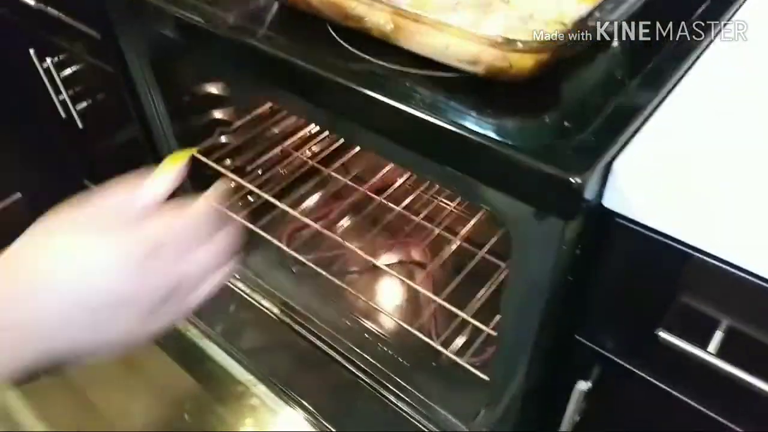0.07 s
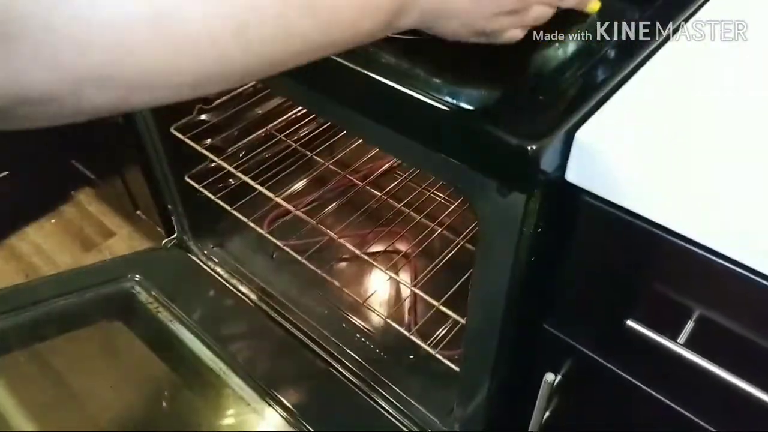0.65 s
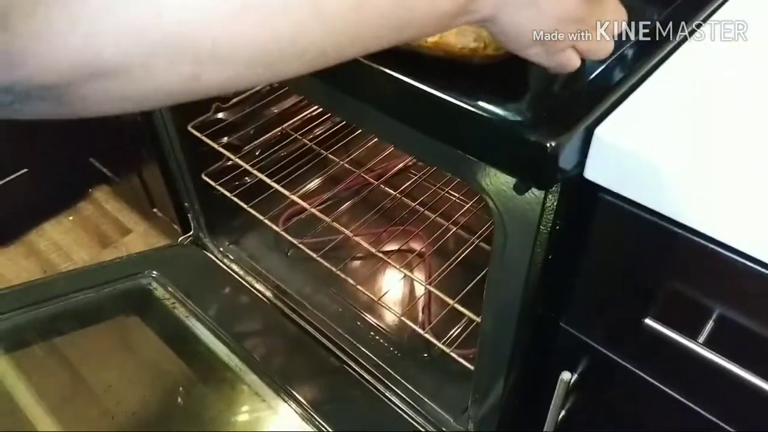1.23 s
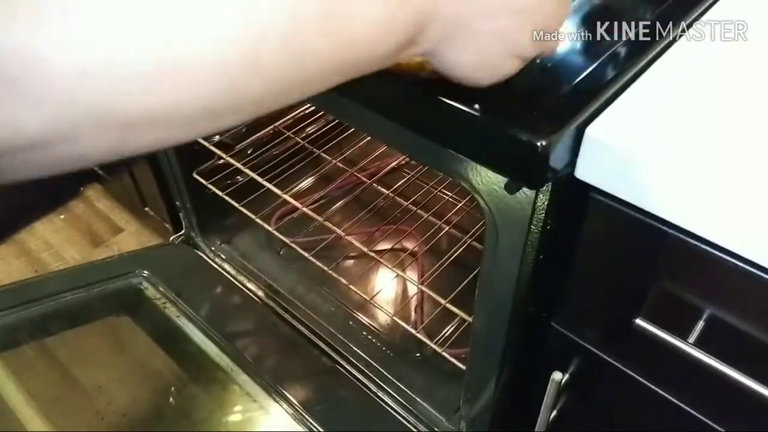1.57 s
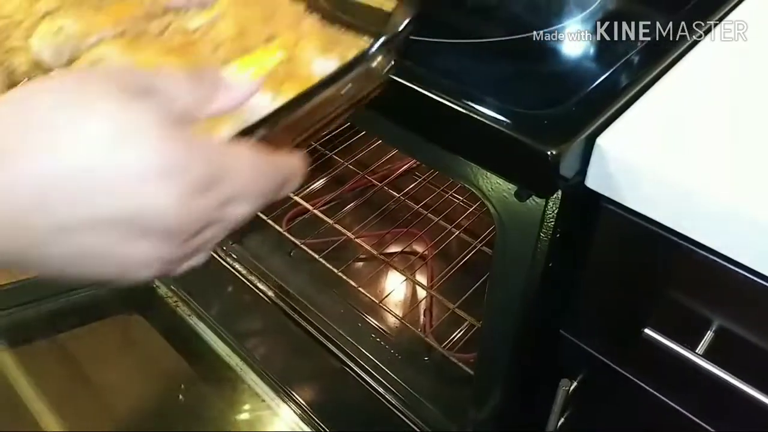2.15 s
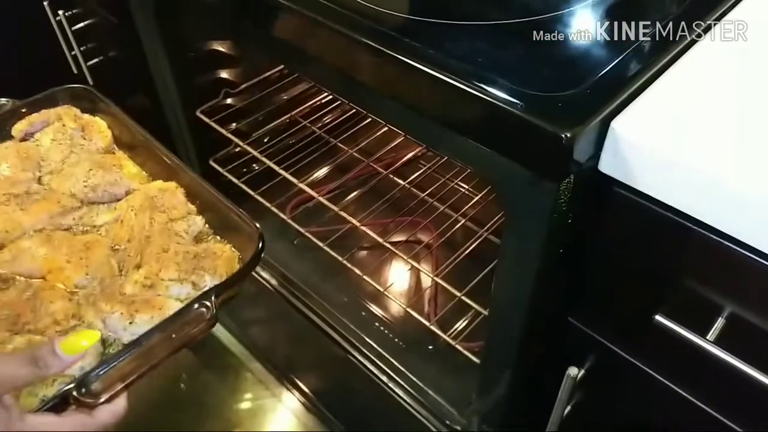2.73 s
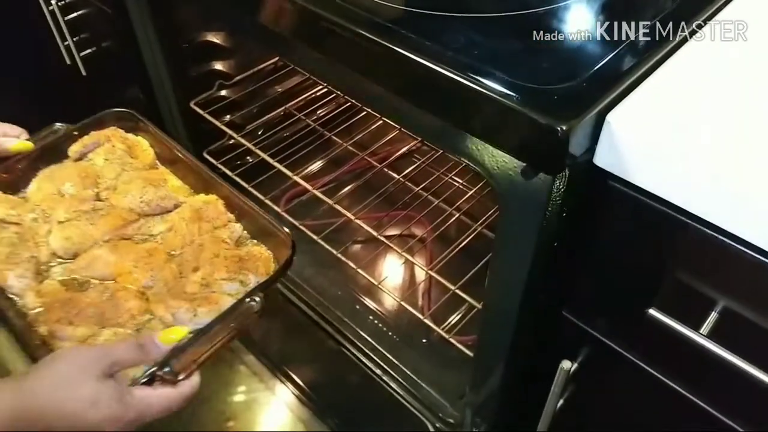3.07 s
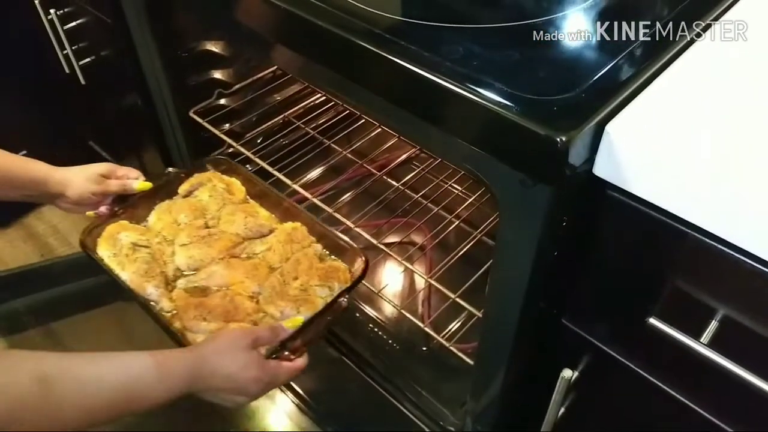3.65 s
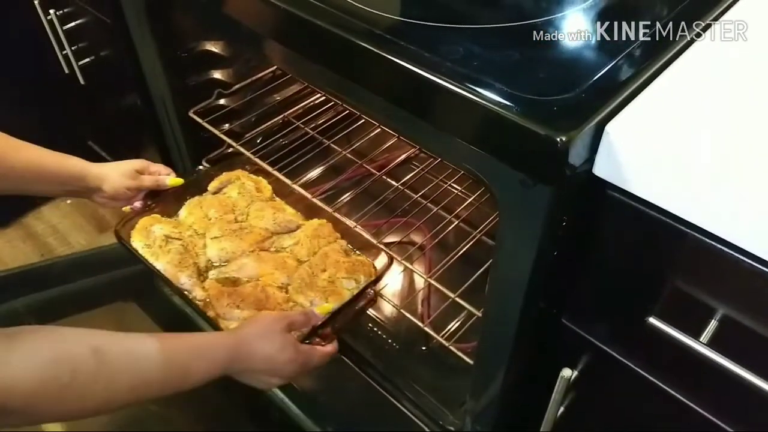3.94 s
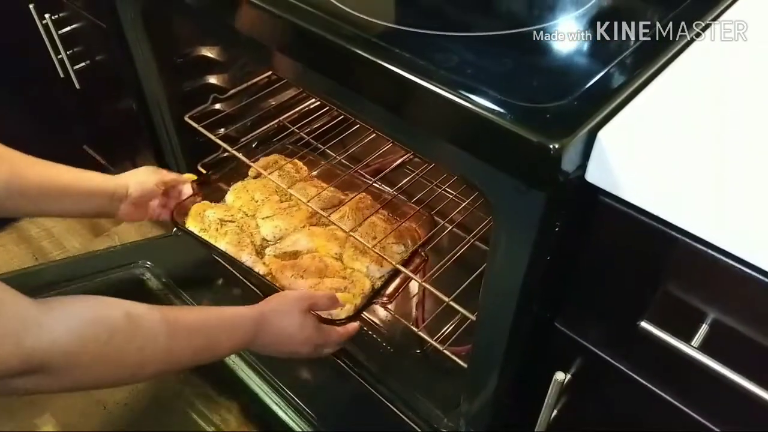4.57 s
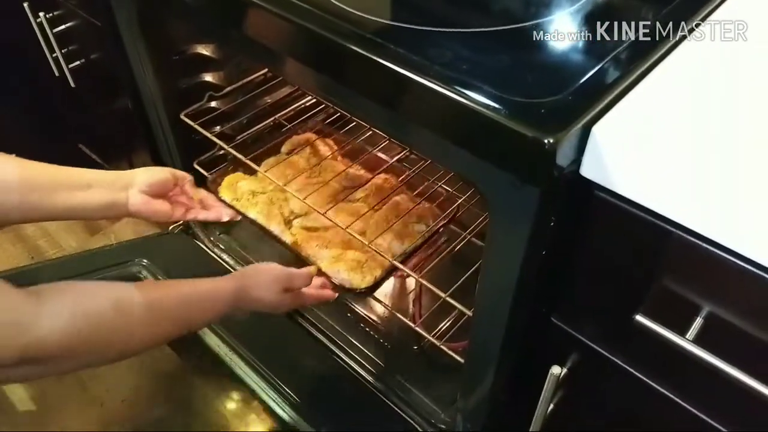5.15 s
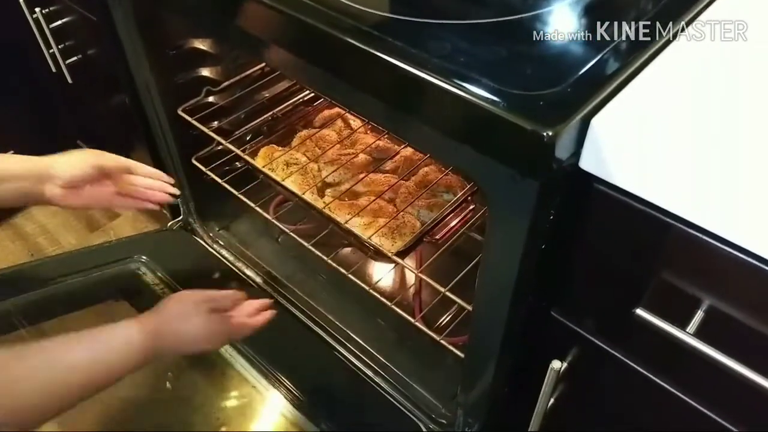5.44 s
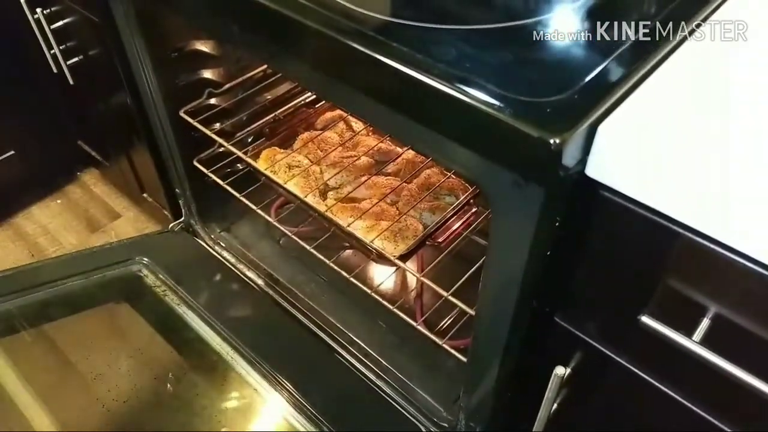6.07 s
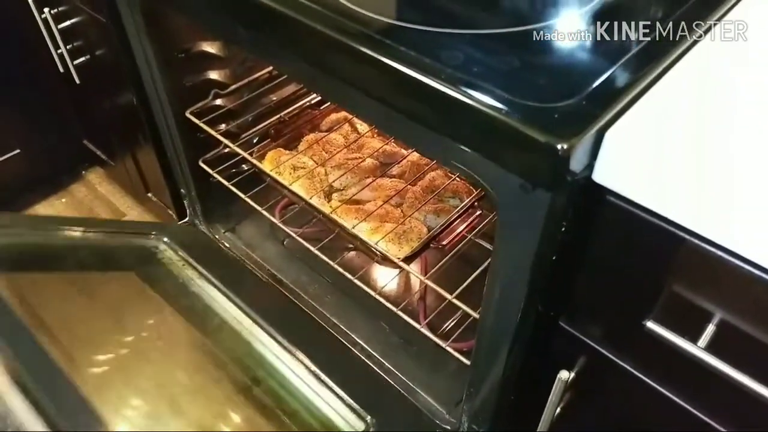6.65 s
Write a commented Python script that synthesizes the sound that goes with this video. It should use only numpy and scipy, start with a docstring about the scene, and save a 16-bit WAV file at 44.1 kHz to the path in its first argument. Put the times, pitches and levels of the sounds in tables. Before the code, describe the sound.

Glass clacks and drags on a stove, then rattles and scrapes over a ringing metal oven rack in a small kitchen.

```python
"""Glass baking dish into the oven.

A full glass dish is knocked and dragged on a glass stove top, thumping the steel panel beneath.
It is lifted, clanks onto a wire rack and judders in, sticking and slipping, while the rack and the
steel oven box ring. Then the door bobs, clunks on its hinge and starts to swing up.
A small, hard kitchen answers the knocks and scrapes."""
import sys
import numpy as np
from scipy import signal
from scipy.fft import rfft, irfft, next_fast_len
from scipy.io import wavfile
from scipy.ndimage import uniform_filter1d, map_coordinates

SR = 44100
rng = np.random.default_rng(int(sys.argv[2]) if len(sys.argv) > 2 else 0)


def persist_wave(psi):
    """Save psi, clipped to +-1, as 16-bit WAV."""
    counts = np.round(np.clip(psi, -1, 1) * 32767).astype(np.int16)
    wavfile.write(sys.argv[1], SR, np.atleast_2d(counts).T)


N = 300313

# shoves of the dish over the wires: start_s, end_s, level_db
SHOVES = [(4.055, 4.7, -33), (4.635, 4.867, -20), (4.848, 5.381, -23), (5.234, 5.805, -31)]
# glass on the stove top: start_s, level_db, presence_db, treble_db, thump_vs_clack_db
STOVE_KNOCKS = [(0.012, -48.5, 9, 18.5, -14), (0.057, -37, -1.5, 6.5, -47), (0.831, -41, -10.5, -16, 6),
                (1.013, -23, 0, 2, 4.5), (1.022, -34.5, -1, -7, 3), (1.101, -34.5, -3.5, 3, 6),
                (1.165, -45.5, 4, 21, 8.5)]
# resonances of the rack's long bars: pitch_hz, level_db
BAR_MODES = [(237, -7.5), (258, -2.5), (275, -3), (333, -1), (361, -3), (452, -15.5)]
# resonances of the steel oven box: pitch_hz, level_db
BOX_MODES = [(95, -7.5), (116, -4.5), (140, -3.5), (172, -3.5), (189, -11)]
# spectrum of the low rumble of stove and room: frequency_hz, level_db
RUMBLE_COLOUR = [(13, -66), (22, -27.5), (42, -9), (66, -3), (133, -2), (193, -13), (243, -22),
                 (381, -28.5), (400, -31.5), (520, -53), (880, -120)]


def rack_judder():
    """The dish lands and jumps from wire to wire; between the jumps it chatters over them."""
    # jumps onto a wire: start_s, level_db, presence_db, treble_db
    clanks = [(4.061, -23, 3, -1), (4.168, -24.5, -3, -5.5), (4.319, -28, 0.5, -13), (4.442, -34, -9.5, -5),
              (4.617, -31.5, 1, 6), (4.632, -22.5, -2.5, -5.5), (4.759, -18, -2, -3.5),
              (4.863, -31, -11.5, 2.5), (4.887, -19, 0, -2.5), (4.978, -24.5, -10, 0),
              (5.051, -25.5, -4, -3), (5.295, -22, -0.5, -11.5), (5.466, -37, -1.5, 10.5),
              (5.641, -40, -0.5, 4.5)]
    # resonances of the loaded wires: pitch_hz, level_db
    wire_modes = [(909.8, -57.5), (1012, -45.5), (1561, -44), (1739, -43.5), (1906, -42), (2078, -46),
                  (2196, -45), (2320, -45.5), (2487, -52.5), (2519, -37.5)]
    # spectrum of glass striking the rack: frequency_hz, level_db
    rack_colour = [(240, -30.5), (400, -5), (488, -16), (535, -7), (705, -9.5), (886, -3.5), (1220, -7),
                   (1510, -4.5), (1630, -4.5), (2320, -2.5), (2590, -0.5), (3300, -8), (5230, -10),
                   (9790, -26), (15500, -32)]
    # spectrum of the squeaky grit of glass on wire: frequency_hz, level_db
    grit_colour = [(3000, -36.5), (6000, -3.5), (8000, -1.5), (11000, -15), (15500, -6.5)]
    out = np.zeros(N)
    wires = [(hz, db, .14) for hz, db in wire_modes]  # short decay: the heavy dish damps them
    for s, db, presence_db, treble_db in clanks:
        clank = contact(rack_colour, treble_db, presence_db, ripple_db=3, spacing_hz=70.04)
        clank += amp(-16.5) * ring(wires)
        add(out, s, db, kitchen(clank, early_s=.0099, tail_db=2.5, direct=13))
        graze = kitchen(clank, early_s=.0028, tail_db=-18.5, direct=1)
        add(out, s - .004, db - 14, graze)  # the glass brushes the wire first
    force = push()
    body = contact(rack_colour, treble_db=-3.5) + amp(-16) * ring(wires, scatter_db=3)
    chatter = signal.fftconvolve(force * slips(per_s=120, spread_db=.5), body)[:N]
    grit = signal.fftconvolve(force * slips(per_s=90, spread_db=6.5), contact(grit_colour))[:N]
    return out + amp(-2.5) * kitchen(chatter + amp(-13.5) * grit, early_s=.012, tail_db=-3, direct=2.1)


def push():
    """Force on the dish as a gain per sample: every shove builds fast, eases off and stops."""
    return strokes(SHOVES, attack_s=.11, release_s=.27, ease_db_per_s=17.5)


def oven_body():
    """The judder shakes the steel box and the rack's long bars, which drone on."""
    box = resonate(slips(per_s=360, spread_db=-1), BOX_MODES, width_hz=24.8)
    box *= rings_on(push(), follow=.36, fall_db_per_s=110)
    bars = resonate(slips(per_s=340, spread_db=6.5), BAR_MODES, width_hz=10.8)
    bars *= rings_on(push(), follow=.59, fall_db_per_s=25)
    return amp(-35.5) * box + amp(-34) * bars


def free_wires():
    """Wires that the dish does not touch sing on faintly after each shove."""
    # resonances of the free wires: pitch_hz, level_db
    wire_modes = [(810, -3), (1090, -5.5), (1450, -0.5), (1750, -2.5), (2290, -1), (2680, -4), (3020, -7.5),
                  (4650, -13.5)]
    singing = resonate(slips(per_s=670, spread_db=2.5), wire_modes, width_hz=130)
    return amp(-34.5) * rings_on(push(), follow=.54, fall_db_per_s=43) * singing


def glass_chirps(count=40, low_hz=4450, high_hz=11100):
    """Glass catches on the wires at random, louder under a harder push and fainter at higher pitch."""
    out, force = np.zeros(N), push()
    start, end = SHOVES[0][0], SHOVES[-1][1]
    for when, pitch in rng.random(size=(count, 2)):
        s = start + when * (end - start)
        hz = low_hz * (high_hz / low_hz) ** pitch
        strength = force[round(s * SR)] * low_hz / hz
        add(out, s, -20.5 + 20 * np.log10(strength + 1e-9), ping(hz, t60_s=.08))
    return out


def stove_top():
    """The dish clacks on the glass top, whose steel panel thumps, and is dragged off the edge."""
    # spectrum of the clack: frequency_hz, level_db
    clack_colour = [(180, -24), (300, -5.5), (439, -10.5), (517, 1), (571, -10), (663, -1), (794, -5.5),
                    (1180, -2), (1460, -7), (1780, -4), (2740, -4.5), (4490, -15), (8840, -33.5),
                    (14300, -46), (15500, -44)]
    # partials of the glass top: pitch_hz, level_db, t60_s
    top_modes = [(628, 6.5, 0.33), (1067, -3, 0.2), (1405, -3, 0.63), (1580, -13.5, 1), (1800, -20.5, 0.61),
                 (2348, -13, 0.59), (2550, -30, 0.47), (2770, 0, 0.26), (2830, -9, 0.25), (2955, -19, 0.49),
                 (3235, -23, 0.19), (3233, -13, 0.31)]
    # partials of the steel panel: pitch_hz, level_db, t60_s
    panel_modes = [(124.4, -5, 0.21), (150.5, -2, 0.26), (174.3, 7.5, 0.13), (183.5, -11, 0.88),
                   (217.7, -10.5, 0.27), (334.9, -9.5, 0.17), (530, -14.5, 0.053)]
    # the dish leans on the panel: start_s, level_db
    bumps = [(.252, -61), (.792, -51.5), (1.545, -46)]
    # drags across the top: start_s, end_s, level_db
    drags = [(1.22, 1.56, -50.5), (1.48, 1.85, -38)]
    # spectrum of glass rubbing on glass: frequency_hz, level_db
    rub_colour = [(120, -35.5), (200, -1), (280, -11.5), (461, -4.5), (646, -8), (890, -1.5), (956, -7),
                  (1030, -2.5), (1910, -4.5), (3200, -11), (9140, -42.5), (14000, -57.5)]
    out = np.zeros(N)
    for s, db, presence_db, treble_db, thump_db in STOVE_KNOCKS:
        clack = contact(clack_colour, treble_db, presence_db, ripple_db=2) + amp(-20.5) * ring(top_modes)
        add(out, s, db, kitchen(clack, early_s=.014, tail_db=-1.5, direct=1.4, build_s=.0016))
        add(out, s + .004, db + thump_db, ring(panel_modes, scatter_db=1, attack_s=.006))
    for s, db in bumps:
        add(out, s, db, ring(panel_modes, attack_s=.0051))
    force = strokes(drags, attack_s=.14, release_s=.12, ease_db_per_s=-.5)
    rubbing = signal.fftconvolve(force * slips(per_s=450, spread_db=3.5), contact(rub_colour))[:N]
    return out + amp(-3) * kitchen(rubbing, early_s=.0075, tail_db=-14.5, direct=8.7)


def stove_shudder():
    """The whole stove rumbles after each knock, under the sliding dish and as the door swings."""
    # the door starts to rise: start_s, end_s, level_db
    swings = [(6.25, 6.85, -55.5)]
    jolts = np.zeros(N)
    for s, db, *_ in STOVE_KNOCKS:
        jolts[round(s * SR)] = amp(db)
    knocked = amp(-41.5) * rings_on(jolts, follow=.61, fall_db_per_s=27.5)
    pushed = amp(-49.5) * rings_on(push(), follow=.25, fall_db_per_s=59)
    swung = strokes(swings, attack_s=.051, release_s=.06, ease_db_per_s=-4)
    return (knocked + pushed + swung) * noise(RUMBLE_COLOUR)


def oven_door(clunk_s=6.285, box_t60_s=.54, bars_t60_s=.86):
    """The door bobs with dull thuds; its hinge takes the load with a clunk that jolts box and bars."""
    # bobs of the open door: start_s, level_db
    thuds = [(5.631, -48), (5.917, -53), (6.283, -50), (6.606, -46)]
    # partials of the door: pitch_hz, level_db, t60_s
    door_modes = [(62.2, -4, 0.55), (97.2, -7.5, .5), (120.6, -10.5, 0.26)]
    # spectrum of the hinge clunk: frequency_hz, level_db
    clunk_colour = [(60, -18), (130, -5), (260, 8.5), (400, 1), (650, -1.5), (1000, -39), (3000, -81)]
    out = np.zeros(N)
    for s, db in thuds:
        add(out, s, db, ring(door_modes, attack_s=.0046))
    clunk = click(lambda hz: along(clunk_colour, hz))
    add(out, clunk_s, -50.5, kitchen(clunk, early_s=.024, tail_db=-6, direct=4.4))
    add(out, clunk_s, -50, ring([(hz, db, box_t60_s) for hz, db in BOX_MODES], attack_s=.004))
    add(out, clunk_s, -52, ring([(hz, db, bars_t60_s) for hz, db in BAR_MODES], attack_s=.0041))
    return out


def light_touches():
    """Glancing contacts of glass and metal tick, squeak and ping."""
    # ticks of dish, rack and hinge: start_s, level_db, centre_hz, width_octaves
    ticks = [(1.17, -61, 10000, .8), (1.482, -52, 5700, 0.77), (5.912, -54, 4480, 0.32),
             (6.058, -61.5, 4640, 0.078), (6.201, -52.5, 2977, .45), (6.42, -72.5, 5200, 0.17),
             (6.506, -56.5, 3560, 0.43), (6.552, -68.5, 5900, .9), (6.637, -61, 5150, .45),
             (6.702, -53.5, 3610, .74), (6.736, -54.5, 5230, .65)]
    # glass squeaks as it catches on a wire: start_s, level_db
    squeaks = [(4.613, -52), (4.739, -45), (4.86, -47.5), (5.464, -60)]
    # thin pings of dish and rack: start_s, level_db, pitch_hz
    pings = [(.225, -58, 1300), (0.7, -63, 1345), (.71, -69.5, 2265), (1.939, -60, 1375),
             (1.941, -72.5, 2310), (3.98, -71, 2256), (6.47, -67.5, 2238), (6.652, -62, 828),
             (6.745, -67, 1684)]
    out = np.zeros(N)
    for s, db, centre_hz, width_octaves in ticks:
        add(out, s, db, tick(centre_hz, width_octaves))
    for s, db in squeaks:
        add(out, s, db, tick(centre_hz=13500, width_octaves=.38))
    for s, db, hz in pings:
        add(out, s, db, ping(hz, t60_s=.33) + amp(-.5) * tick(hz, width_octaves=.04))
    return out


def fingers_on_dish(low_hz=1700, high_hz=6110):
    """Stirring fingertips wake faint tinkles; a shift of the grip clinks the whole dish."""
    # fingers stir: start_s, end_s, level_db
    tinkles = [(0.388, 0.552, -75.5), (2.296, 2.581, -80)]
    # the grip shifts: start_s, level_db
    grip_shifts = [(2.889, -48), (2.904, -51.5)]
    # spectrum of the clink: frequency_hz, level_db
    clink_colour = [(150, -48.5), (250, -14), (313, -7.5), (705, -5.5), (823, -10), (961, -2), (1950, -2),
                    (2360, -4), (2490, -20), (2950, 1.5), (5600, -10.5), (7000, -3.5), (15500, -25.5)]
    # partials of the glass dish: pitch_hz, level_db, t60_s
    dish_modes = [(962, 0.5, 0.24), (1836, -1, 0.086), (2340, -7, 0.26), (2760, -15, 0.3),
                  (3260, -29, 0.88), (3601, -16, 0.36), (3970, -15, 0.25), (4270, -10, 0.3),
                  (4635, -0.5, 0.53), (6945, -11.5, 0.56), (8230, -10, 0.31), (8450, -8, 0.48)]
    out = np.zeros(N)
    for start, end, db in tinkles:
        for when, pitch in rng.random(size=(12, 2)):
            hz = low_hz * (high_hz / low_hz) ** pitch
            add(out, start + when * (end - start), db, ping(hz, t60_s=.26))
    for s, db in grip_shifts:
        clink = kitchen(contact(clink_colour), early_s=.013, tail_db=-6, direct=1.2)
        add(out, s, db, clink + amp(-2) * ring(dish_modes))
    return out


def kitchen(x, early_s, tail_db, direct, build_s=.005):
    """A sound arrives by the direct path, a swell of near reflections and the room's tail."""
    # decay of the room: frequency_hz, t60_s
    decay = [(200, 0.89), (700, 0.71), (2000, 0.6), (5000, 0.65), (13000, 0.096)]
    size = SR * 2 // 3
    hz, t, spectrum = signal.stft(rng.standard_normal(size), SR, nperseg=256)
    fade = amp(-60 * t / along(decay, hz)[:, None])
    tail = signal.istft(spectrum * fade, SR, nperseg=256)[1][:size]
    age = np.arange(size) / SR
    near = rng.standard_normal(size) * age / early_s * np.exp(1 - age / early_s)
    paths = near + amp(tail_db) * tail * (1 - np.exp(-age / build_s))
    paths[0] += direct
    return signal.fftconvolve(x, paths / np.linalg.norm(paths))[:len(x)]


def room_tone(hiss_db=-69, rumble_db=-63.5, wander_db=.5):
    """A faint even hiss over a low, uneven rumble."""
    # spectrum of the hiss: frequency_hz, level_db
    hiss_colour = [(180, -29.5), (300, -4.5), (1970, -10), (2170, -10), (2480, -11), (3020, -12.5),
                   (4070, -13.5), (15500, -16.5)]
    wander = map_coordinates(rng.standard_normal(64), [np.arange(N) / SR * 4])
    return amp(hiss_db) * noise(hiss_colour) + amp(rumble_db + wander_db * wander) * noise(RUMBLE_COLOUR)


def contact(colour, treble_db=0, presence_db=0, ripple_db=.7, spacing_hz=110):
    """A hard click: sharper contact is brighter, and many points touching at once leave little ripple."""
    def gain_db(hz):
        treble = hz ** 6 / (hz ** 6 + 5400 ** 6)
        presence = np.exp(-(np.log2((hz + 1) / 4300) / .63) ** 2)
        tone_db = along(colour, hz) + treble_db * treble + presence_db * presence
        return tone_db + ripple_db * ripple(hz, spacing_hz)
    return click(gain_db)


def tick(centre_hz, width_octaves):
    """A light touch rings a small cluster of modes into the room."""
    hump_db = lambda hz: -np.minimum(2.3 * (np.log2((hz + 1) / centre_hz) / width_octaves) ** 2, 70)
    touch = click(lambda hz: hump_db(hz) + 4 * ripple(hz, spacing_hz=170))
    return kitchen(touch, early_s=.019, tail_db=2.5, direct=3.2)


def ripple(hz, spacing_hz):
    """Random peaks and dips along frequency: each point of contact wakes other modes."""
    return map_coordinates(rng.standard_normal(2000), [hz / spacing_hz])


def click(gain_db, size=4096):
    """A click of energy 1 with its spectrum shaped by gain_db(hz)."""
    gain = np.maximum(amp(gain_db(np.fft.rfftfreq(size, 1 / SR))), 1e-6)
    cepstrum = irfft(np.log(gain))
    cepstrum[1:size // 2] *= 2  # minimum phase packs the energy into the attack
    cepstrum[size // 2 + 1:] = 0
    pulse = irfft(np.exp(rfft(cepstrum)))
    return np.pad(pulse / np.linalg.norm(pulse), (0, SR - size))


def ping(hz, t60_s):
    """Two close modes that beat as they fade."""
    return ring([(hz, 0, t60_s), (1.03 * hz, -4, t60_s)], scatter_db=-1, attack_s=.001)


def ring(modes, scatter_db=-2, attack_s=.002):
    """One second of damped partials, energy 1, at new strengths for every blow."""
    t = np.arange(SR, dtype=np.float32) / SR
    x = np.zeros(SR)
    for hz, db, t60_s in modes:
        strength = amp(db + scatter_db * rng.standard_normal())
        x += strength * np.exp(-np.log(1000) / t60_s * t) * np.sin(2 * np.pi * hz * t)
    x *= 1 - np.exp(-t / attack_s)
    return x / np.linalg.norm(x)


def slips(per_s, spread_db):
    """Stick and slip: irregular tiny jolts of uneven size, rms 1."""
    sizes = amp(spread_db * np.clip(rng.standard_normal(N), -2, 2))
    slipping = rng.random(N) < per_s / SR
    return unit(slipping * sizes * np.sign(rng.standard_normal(N)))


def resonate(drive, modes, width_hz):
    """A drive through narrow resonances, rms 1."""
    band = lambda hz, centre: 1j * hz * width_hz / (centre ** 2 - hz ** 2 + 1j * hz * width_hz)
    return unit(filtered(drive, lambda hz: sum(amp(db) * band(hz, centre) ** 2 for centre, db in modes)))


def strokes(rows, attack_s, release_s, ease_db_per_s):
    """Gain of hand strokes: each builds, eases off (swells if the ease is negative) and fades out."""
    t, gain = np.arange(N) / SR, np.zeros(N)
    for start, end, db in rows:
        level = amp(db - ease_db_per_s * np.clip(t - start, 0, end - start))
        gain += level * np.clip((t - start) / attack_s, 0, 1) * np.clip((end - t) / release_s, 0, 1)
    return gain


def rings_on(force, follow, fall_db_per_s):
    """Gain, at most 1, of a part that grows as a power of the force and dies away at its own pace."""
    fall = amp(-fall_db_per_s * np.arange(N) / SR)
    return np.maximum.accumulate((force / force.max()) ** follow / fall) * fall


def noise(colour):
    """Coloured noise of rms 1."""
    return unit(filtered(rng.standard_normal(N), lambda hz: amp(along(colour, hz))))


def add(track, start_s, db, sound):
    """Lay a sound on the track with its attack at the given rms level."""
    span = track[round(start_s * SR):][:len(sound)]
    attack_rms = np.sqrt(np.mean(sound[:1300] ** 2))
    span += amp(db) * sound[:len(span)] / attack_rms


def filtered(x, response):
    """x through a frequency response."""
    size = next_fast_len(len(x) + SR // 4)
    return irfft(rfft(x, size) * response(np.fft.rfftfreq(size, 1 / SR)), size)[:len(x)]


def along(points, hz):
    """A curve through (frequency_hz, value) points on a log axis."""
    point_hz, values = np.transpose(points)
    return np.interp(np.log(hz + 1), np.log(point_hz + 1), values)


def amp(db):
    """Decibels to gain."""
    return 10 ** (np.asarray(db) / 20)


def unit(x):
    """x at rms 1."""
    return x / np.sqrt(np.mean(x ** 2) + 1e-20)


def suppress(x, depth_db=8, margin_db=9, from_hz=300):
    """A noise suppressor turns down whatever barely rises over the hiss, so tails end early."""
    hz, _, spectrum = signal.stft(x, SR, nperseg=512)
    power = uniform_filter1d(np.abs(spectrum) ** 2, size=2, axis=0)
    power = np.abs(uniform_filter1d(power, size=4, axis=1))
    hiss = np.percentile(power, 20, axis=1, keepdims=True) + 1e-20
    shut = 1 / (1 + (power / (hiss * amp(margin_db) ** 2)) ** 2)
    reach = (hz ** 2 / (hz ** 2 + from_hz ** 2))[:, None]
    return signal.istft(spectrum * amp(-depth_db * shut * reach), SR, nperseg=512)[1][:N]


def scene():
    """Dish, stove, oven and room in mono."""
    sliding = rack_judder() + glass_chirps() + free_wires() + oven_body()
    stove = stove_top() + stove_shudder() + oven_door()
    return (sliding + stove + light_touches() + fingers_on_dish() + room_tone())[None]


def record(dry, low_hz=38, top_hz=15700):
    """The phone suppresses noise and loses the deepest bass and the highest treble."""
    def response(hz):
        low_cut = (1j * hz) ** 2 / (low_hz ** 2 - hz ** 2 + 1j * np.sqrt(2) * low_hz * hz)
        return low_cut * (hz < top_hz)
    return np.array([filtered(suppress(channel), response) for channel in dry])


dry = scene()
out = record(dry)
persist_wave(out)
```